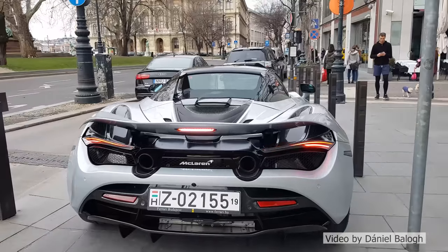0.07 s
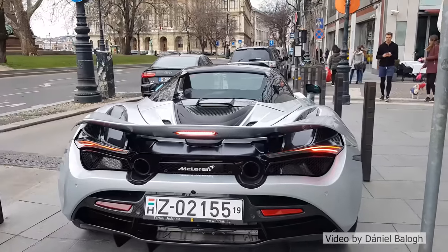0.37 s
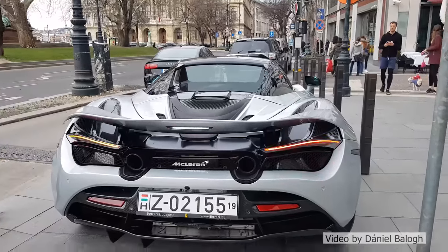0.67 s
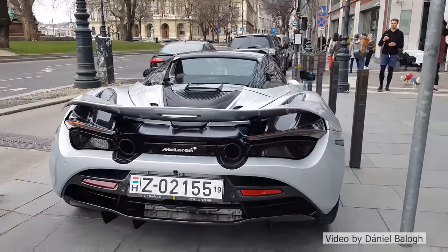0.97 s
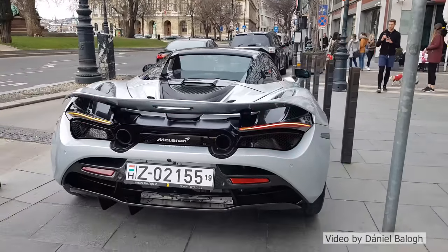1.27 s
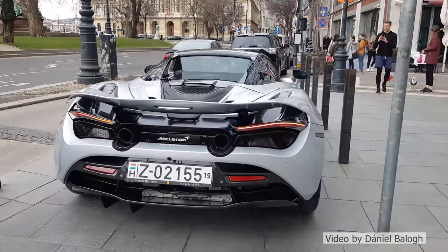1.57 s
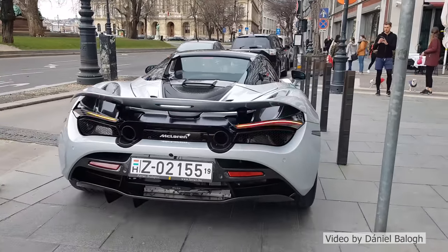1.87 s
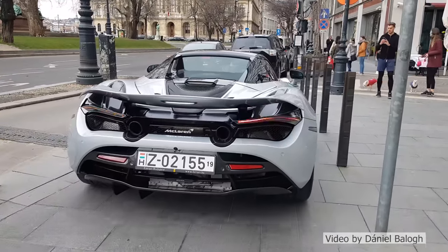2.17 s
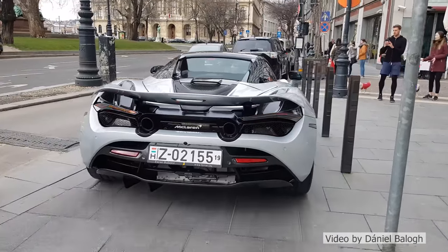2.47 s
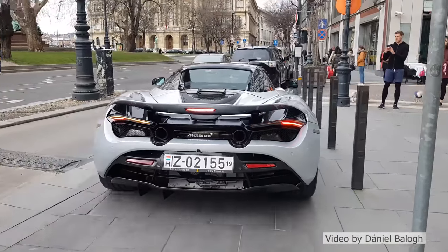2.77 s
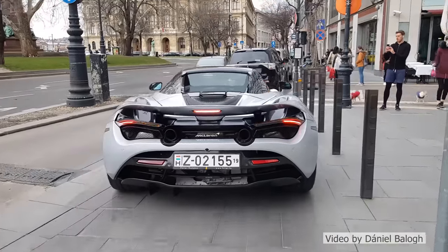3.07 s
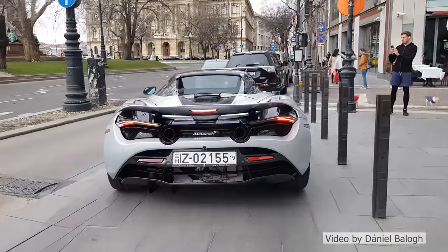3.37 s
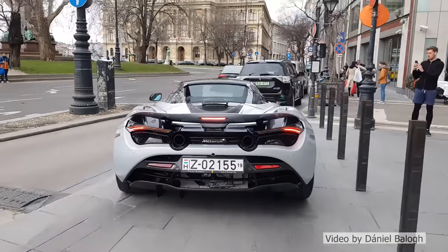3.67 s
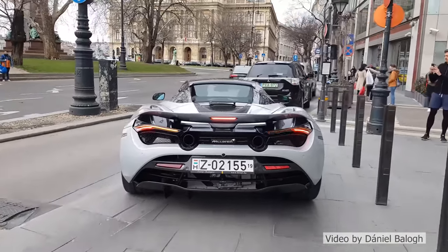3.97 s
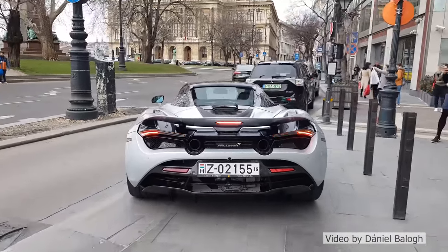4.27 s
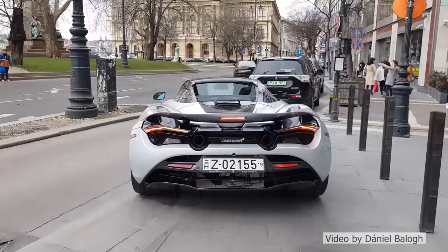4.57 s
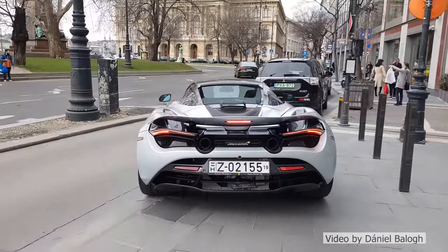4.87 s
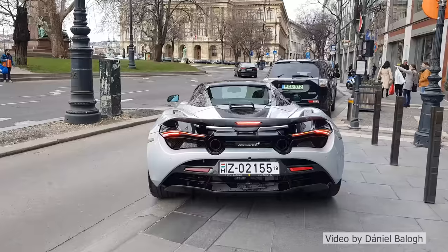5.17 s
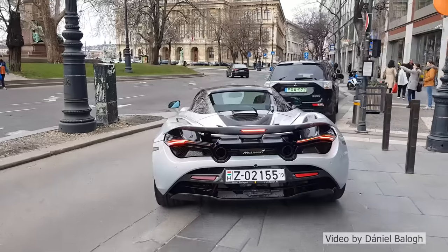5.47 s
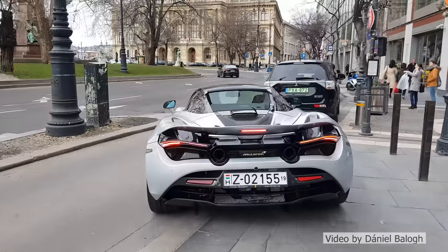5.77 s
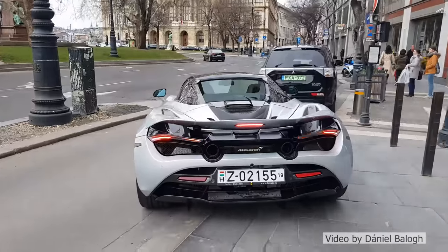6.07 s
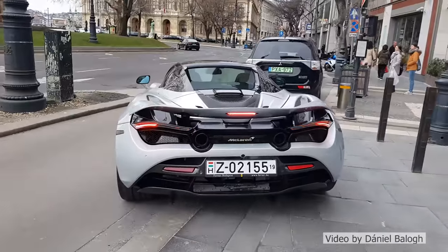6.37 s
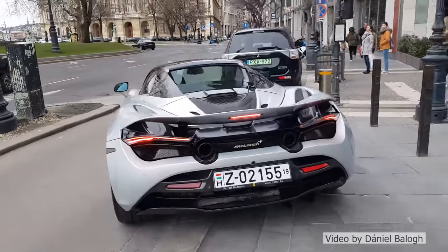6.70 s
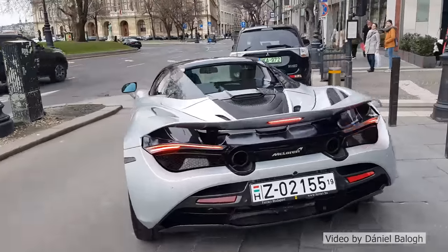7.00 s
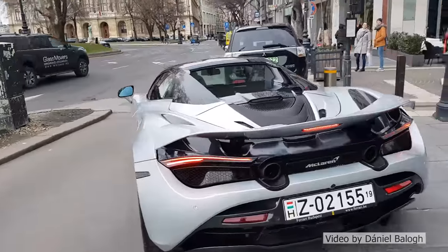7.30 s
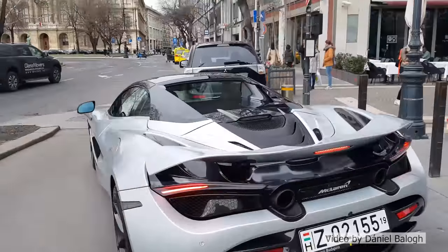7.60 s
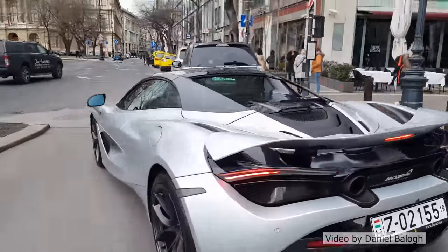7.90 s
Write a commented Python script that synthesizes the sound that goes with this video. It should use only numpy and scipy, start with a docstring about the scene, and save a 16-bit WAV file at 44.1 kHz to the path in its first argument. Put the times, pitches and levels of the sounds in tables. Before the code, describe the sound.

A sports car idles deeply, revs gently once, then creeps along with an uneven throb over faint city street noise.

```python
"""A V8 sports car creeps off a pavement into a city street, followed by a hand-held camera.
It idles over the street's wash, with fan tones and the turbulent rush of gas; a shoe scuffs the paving.
One gentle rise of revs sweeps the firing tone into the exhaust's resonance, which booms near 2 s.
The revs sink, the fan stops, and from 4.3 s the clutch takes the load: unequal firings lope and throb.
Near 6 s fingers click and rub on the camera, which then closes in on the car's rear wing."""
import sys
import numpy as np
from scipy import signal
from scipy.fft import rfft, irfft
from scipy.io import wavfile
from scipy.ndimage import map_coordinates

SR = 44100
rng = np.random.default_rng(int(sys.argv[2]) if len(sys.argv) > 2 else 0)


def wrap_up_sound(samples):
    """Save the sound to the file named by the first command line argument, as 16-bit audio."""
    columns = np.atleast_2d(samples).T
    # keep every value between -1 and 1, then stretch to whole-number steps
    tamed = np.clip(columns, -1, 1)
    steps = np.round(tamed * 32767).astype(np.int16)
    wavfile.write(sys.argv[1], SR, steps)


N = 354563
TIME = np.arange(N) / SR


def gain_of(db):
    """Amplitude ratio of a level in decibels."""
    return 10 ** (np.asarray(db) / 20)


def unit_rms(x):
    """Normalisation to rms 1."""
    return x / np.sqrt(np.mean(x ** 2) + 1e-20)


def curves(rows):
    """Linear interpolation of each column of a timed table."""
    times, *columns = np.transpose(rows)
    return [np.interp(TIME, times, column) for column in columns]


def ramp(start_s, end_s):
    """Linear transition from 0 to 1."""
    return np.interp(TIME, (start_s, end_s), [0, 1])


def swell(at_s, half_width_s):
    """Gaussian envelope of height 1."""
    return np.exp(-((TIME - at_s) / half_width_s) ** 2)


def wander(rate_hz):
    """Random modulation of rms 1, band-limited to about the given rate."""
    points, coarse_s = rng.standard_normal(4000), TIME[::16]
    smooth = map_coordinates(points, [coarse_s * 2 * rate_hz + 5], order=2, mode="wrap")
    return unit_rms(np.interp(TIME, coarse_s, smooth))


def at_bins(spectrum):
    """Log-frequency interpolation onto the Fourier bins."""
    hz, value = np.transpose(spectrum)
    return np.interp(np.log(np.fft.rfftfreq(N, 1 / SR) + 1), np.log(hz + 1), value)


def coloured(x, spectrum):
    """Spectral shaping, normalised to rms 1."""
    return unit_rms(irfft(rfft(x) * gain_of(at_bins(spectrum)), N))


def resonate(x, hz, width_hz):
    """Two-pole resonance with gain 1 at its centre."""
    return signal.lfilter(*signal.iirpeak(hz, hz / width_hz, SR), x)


def modal_ring(drive, modes):
    """Modal superposition, rms 1; two passes through each resonance keep the valleys dark."""
    return unit_rms(sum(gain_of(db) * resonate(resonate(drive, hz, width), hz, 4 * width)
                        for hz, width, db in modes))


def pan(db):
    """Channel gains for a left-minus-right level difference."""
    return gain_of([[db / 2], [-db / 2]])


def whine(hz, db, width_hz, steady=0):
    """Line broadening: turbulence blurs a tone in each channel; `steady` weights the pure part."""
    blur = np.array([steady + wander(width_hz) + 1j * wander(width_hz) for side in range(2)])
    carrier = np.exp(2j * np.pi * np.cumsum(hz * np.ones(N)) / SR)
    return gain_of(db) * unit_rms((blur * carrier).real)


def order_lines(firings, orders, waver, waver_hz):
    """Engine orders: wavering harmonics of the crank, which turns once in four firings; rms 1."""
    out = np.zeros(N)
    for order, db in orders:
        angle = 2 * np.pi * (order * firings / 4 + rng.random())
        in_phase = 1 + waver * wander(waver_hz)
        quadrature = waver * wander(waver_hz)
        out += gain_of(db) * (in_phase * np.cos(angle) + quadrature * np.sin(angle))
    return unit_rms(out)


# Likeness of the two channels: (frequency [Hz], correlation [-1 to 1])
COHERENCE = [(20, 0.71), (150, 1), (300, 0.72), (550, 0.97), (900, 0.15), (2000, 0.25), (4000, -0.0032),
             (8000, -0.0024), (16000, -0.11)]
def air():
    """Spatial coherence: white noise, alike in both channels in the bass and diffuse in the treble."""
    left, independent = rfft(rng.standard_normal((2, N)))
    likeness = at_bins(COHERENCE)
    right = likeness * left + np.sqrt(1 - likeness ** 2) * independent
    return irfft(np.array([left, right]), N)


# Spectrum of the street: (frequency [Hz], relative level [dB])
STREET_SPECTRUM = [(20, -3), (60, 12.5), (150, -3.5), (400, -30), (1000, -7), (2000, -19.5), (5000, -36),
                   (15000, -47)]
def street():
    """Stationary noise: the city's steady wash."""
    return gain_of(-40.5) * coloured(air(), STREET_SPECTRUM)


def scuff():
    """Friction noise: a shoe brushes the paving."""
    grit = coloured(air(), [(500, -27), (1300, -2), (3000, 4), (4500, -6), (9000, -28)])
    return gain_of(-44) * grit * swell(0.283, 0.024)


# Faint high chirps: (time [s], half-width [s], frequency [Hz], level [dB])
CHIRPS = [(7.793, 0.0039, 9780, -43), (7.815, 0.0027, 5210, -38), (7.825, 0.006, 7500, -42)]
def squeaks():
    """Narrow-band noise in very short bursts."""
    noise = air()
    return sum(gain_of(db) * swell(s, half_width) * unit_rms(resonate(noise, hz, width_hz=600))
               for s, half_width, hz, db in CHIRPS)


# Slips of a finger: (time [s], half-width [s], level before panning [dB])
FINGER_SLIPS = [(6.256, 0.0075, -35), (6.48, 0.013, -45)]
def rubs():
    """Friction noise: skin brushes the camera's case."""
    grit = coloured(air(), [(3000, 2), (9000, -6), (12000, -1), (15000, -2)])
    return grit * pan(-10) * sum(gain_of(db) * swell(s, half_width) for s, half_width, db in FINGER_SLIPS)


# Tiny knocks: (time [s], level [dB], frequency [Hz], decay [ms], left minus right [dB])
CASE_KNOCKS = [(5.6777, -19, 12930, 0.13, 12), (5.7024, -7.5, 8470, 0.066, 26),
               (5.7029, -14.5, 1672, 0.63, 24), (6.168, -11, 12010, 0.083, -20),
               (6.2013, -6, 12310, 0.1, -20), (6.2527, -32, 2198, 0.21, -25)]
def clicks():
    """Damped oscillation: the camera's case rings for an instant, mostly in one channel."""
    out, t = np.zeros((2, N)), np.arange(1024) / SR
    for s, db, hz, decay_ms, side_db in CASE_KNOCKS:
        start = round(s * SR)
        knock = -gain_of(db) * np.exp(-1000 * t / decay_ms) * np.cos(2 * np.pi * hz * t - np.pi / 4)
        out[:, start:start + len(t)] += knock * pan(side_db) / pan(side_db).max()
    return out


# Firmer taps: (time [s], unfiltered level [dB], width [ms], cutoff [Hz], left minus right [dB])
CASE_TAPS = [(5.7022, -11, 0.15, 7000, 24), (6.2528, 0, 0.7, 2000, -24)]
def thumps():
    """Critical damping: a quick push on the case and its slower rebound."""
    out, t = np.zeros((2, N)), np.arange(1024) / SR
    for s, db, width_ms, cutoff_hz, side_db in CASE_TAPS:
        start, age = round(s * SR), 1000 * t / width_ms
        push = signal.lfilter(*signal.butter(2, cutoff_hz, fs=SR), (age - 1) * np.exp(-age))
        out[:, start:start + len(t)] += gain_of(db) * push * pan(side_db) / pan(side_db).max()
    return out


def load():
    """Engine load: 0 running free, 1 once the clutch has taken up the car."""
    return ramp(4.26, 5.1)


# Engine speed: (time [s], firing rate [Hz])
FIRING_RATE = [(0.05, 64.36), (0.66, 59.5), (0.82, 58.9), (0.99, 60.86), (1.11, 63.8), (1.19, 66.35),
               (1.68, 87.75), (1.85, 96.55), (1.87, 96.74), (1.94, 94.5), (2.27, 89.1), (2.43, 84.8),
               (2.6, 82.9), (3.02, 71.4), (3.64, 62.1), (3.85, 60.8), (3.99, 60.8), (4.25, 59.46),
               (4.8, 62.2), (5.18, 63.3), (5.57, 55.47), (6.52, 55.4), (6.76, 56.9), (6.91, 56.93),
               (7.27, 58.46), (7.95, 58.26)]
def firing_hz():
    """The exhaust's fundamental frequency is the rate of firing."""
    return curves(FIRING_RATE)[0]


# The engine's effort, as gas flow: (time [s], level [dB])
GAS_FLOW = [(0.0, -46), (0.09, -45), (0.77, -45), (1.55, -41.5), (2.04, -42), (2.39, -46.5), (3.98, -49),
            (4.78, -44.5), (5.2, -38.5), (5.45, -38), (7.95, -37.5)]
def level(idle_db, per_flow_db, per_octave_db, close_db):
    """Power law: a layer's level in dB follows flow and revs, and gains as the camera nears the wing."""
    idle_flow_db, idle_hz = -48, 60
    flow_db = curves(GAS_FLOW)[0] - idle_flow_db
    octaves = np.log2(firing_hz() / idle_hz)
    return idle_db + per_flow_db * flow_db + per_octave_db * octaves + close_db * ramp(6.194, 7.15)


def fan(blade_hz=332.6, power_off_s=3.65, slowing_per_s=0.4):
    """Blade-passing tone: it holds its pitch until the power is cut, then sinks and dies."""
    hz = blade_hz * np.exp(-slowing_per_s * np.maximum(TIME - power_off_s, 0))
    db = np.maximum(-46 - 7.5 * TIME, -54.5)
    return (1 - ramp(4.21, 4.4)) * whine(hz, db, width_hz=6.3, steady=8.4)


def pump():
    """A broadened tone: the pump's whine, slowly fading."""
    return whine(hz=1698, db=-55 - 3.5 * TIME, width_hz=22, steady=0.52)


# The intake's whistle: (time [s], frequency [Hz], level [dB])
INTAKE_WHISTLE = [(0.9, 3180, -75), (1.45, 3207, -56), (1.9, 3277, -56.5), (2.35, 3260, -66),
                  (2.75, 3269, -58), (3.3, 3211, -68), (4.4, 3030, -69), (4.85, 3066, -57.5),
                  (5.2, 3120, -52.5), (5.6, 3200, -74), (8.0, 3260, -66)]
def intake():
    """Flow noise in a narrow, gliding band."""
    return whine(*curves(INTAKE_WHISTLE), width_hz=60)


# Thin tones: (time [s], half-width [s], frequency [Hz], broadening [Hz], level [dB])
THIN_TONES = [(0.3, 0.66, 380, 5, -62), (1.17, 0.28, 480, 5.916, -56), (0.85, 0.71, 1190, 25, -53.5),
              (1.5, 0.33, 1100, 35, -50.5), (2.1, 0.52, 4400, 299, -67), (1.85, 0.4, 5500, 97, -64),
              (2.827, 0.35, 1090, 35, -53), (2.66, 0.28, 1610, 40, -54), (4.44, 0.74, 830, 37, -51.5),
              (4, 0.55, 11200, 500, -62.5), (4.27, 0.11, 9300, 35, -65), (5.11, 0.55, 6000, 230, -58),
              (5.01, 0.31, 1500, 54, -48)]
def whistles():
    """Narrow-band noise, heard as whistles that come and go."""
    return sum(whine(hz, db, width) * swell(s, half_width) for s, half_width, hz, width, db in THIN_TONES)


# Rings in the engine bay's hiss: (frequency [Hz], bandwidth [Hz], relative level [dB])
BAY_RESONANCES = [(3020, 110, -1.5), (5710, 91, -1), (6070, 58, 3), (9300, 130, -3), (11000, 630, -8.5)]
def engine_bay():
    """Resonances excited by noise, louder under load."""
    return gain_of(-62 + 4.5 * load()) * modal_ring(air(), BAY_RESONANCES)


def ground_bounce(x):
    """Comb filtering: the paving returns a weak copy whose delay drifts as the camera sways."""
    delay_s = 0.0013 * (1 + 0.06 * wander(0.7))
    return x + 0.16 * np.array([np.interp(TIME - delay_s, TIME, side) for side in x])


# Gain of the highest treble: (time [s], gain [dB])
TREBLE_GAIN = [(0.0, 4), (0.8, 1), (1.4, 2), (1.85, -2), (2.3, -0.5), (3.0, 0), (3.9, 2.5), (4.9, 0.5),
               (5.4, 1), (6.0, 1), (6.4, -2.5), (6.65, -2), (6.95, 2), (8.0, 0)]
def sway(x, depth_db=0.96, rate_hz=1.143):
    """Directivity: treble bands drift in level as the camera turns; the top dims and brightens."""
    spectrum, hz = rfft(x), np.fft.rfftfreq(N, 1 / SR)
    centres_hz = np.linspace(3000, 15000, 9)
    low, *treble = [irfft(spectrum * np.interp(hz, centres_hz, band), N) for band in np.eye(9)]
    shares = np.interp(centres_hz[1:], [6000, 10500], [0, 1])
    top_db, = curves(TREBLE_GAIN)
    return low + sum(band * gain_of(depth_db * wander(rate_hz) + share * top_db)
                     for band, share in zip(treble, shares))


# Spectra of roar and hiss, idling and loaded: (frequency [Hz], relative level [dB])
IDLE_ROAR = [(180, -44), (300, -4), (343, -6), (391, -7), (418, -4.5), (451, -5.5), (588, 3.5), (643, -8.5),
             (829, -9.5), (1470, -15), (1640, -13), (2290, -25), (3260, -25.5), (4200, -34), (5460, -39.5),
             (9240, -120)]
LOADED_ROAR = [(180, -100), (300, -15), (400, -13), (437, -8), (510, -8), (588, 4), (694, -13),
               (1020, -8.5), (1400, -14.5), (1680, -14), (2730, -26), (3190, -22.5), (4200, -28.5),
               (5460, -48), (9240, -120)]
IDLE_HISS = [(2240, -6.5), (3800, -2), (3960, -6), (4880, -4.5), (6200, 3.5), (6660, -1), (7730, -1),
             (8550, -5.5), (9020, -4.5), (9920, -2.5), (11200, -1), (13100, -5.5), (15000, -3.5),
             (15800, -2)]
LOADED_HISS = [(2240, -47), (3800, -12), (4710, -2.5), (5910, 4), (6980, 0), (8200, -2), (11600, -0.5),
               (13600, -1), (15100, -4), (15800, 2)]
def rush(firings, hiss_lead_s=0.096):
    """Turbulence noise: fans and escaping gas roar and hiss, pulsing with the engine."""
    noise, pull = air(), load()
    roar = (1 - pull) * coloured(noise, IDLE_ROAR) + pull * coloured(noise, LOADED_ROAR)
    roar = unit_rms(roar - 0.85 * resonate(roar, 605.7, 123))  # hollow where the tailpipes take over
    roar_db = level(idle_db=-45, per_flow_db=1.0913, per_octave_db=-2.5, close_db=0.15)
    roar *= gain_of(roar_db + 0.5 * wander(22)) * (1 + 0.048 * np.cos(2 * np.pi * firings))
    hiss = unit_rms((1 - pull) * coloured(noise, IDLE_HISS) + pull * coloured(noise, LOADED_HISS))
    hiss_db = level(idle_db=-54.5, per_flow_db=1, per_octave_db=1.8, close_db=0.9)
    hiss_db = np.maximum(hiss_db, np.interp(TIME + hiss_lead_s, TIME, hiss_db))  # rises ahead of the roar
    hiss *= gain_of(hiss_db + 0.76 * wander(12)) * (1 + 0.15 * np.cos(np.pi * firings))
    return roar * pan(-0.81) + hiss * pan(-0.4)


# The tailpipes' ring: (time [s], relative level [dB])
RING_ENVELOPE = [(0.0, -43), (0.25, -45), (0.85, -44), (1.15, -38), (1.9, -39), (2.4, -43.5), (3.1, -47),
                 (3.8, -40), (4.3, -39.5), (4.7, -44.5), (5.1, -45), (5.4, -35.5), (6.8, -31), (7.3, -36),
                 (8.0, -35.5)]
def ring_db():
    """Envelope in dB shared by the tailpipes' resonances and their tone."""
    return curves(RING_ENVELOPE)[0] - 6.5


def pipe_tone():
    """Edge tone: gas crossing the tailpipes' lips holds a narrow note that weakens under load."""
    hz = 596 * (1 + 0.01 * wander(1.2))
    return whine(hz, ring_db() - 1.5 - 5.5 * load(), width_hz=11, steady=1.9)


# Strength of each cylinder in firing order: (relative level [dB])
CYLINDER_LEVELS = [-3.5, -16.5, -3, -8, -4.5, -7.5, -3, -7]
# Tailpipe resonances: (frequency [Hz], bandwidth [Hz], relative level [dB])
TAILPIPE_MODES = [(579, 51, -24), (596, 48, 8), (1032, 48, -2.5), (1684, 150, -16.5)]
# Muffler transmission: (frequency [Hz], relative gain [dB])
MUFFLER_RESPONSE = [(20, -40), (36, 0), (46, 8), (90, 12), (140, 1), (175, 1.5), (205, 1), (232, 0.5),
                    (265, -3.5), (330, -7), (420, -11.5), (520, -20), (800, -43)]
def puffs(firings, gas_share=0.6, decay_firings=0.43):
    """Source and filter: each firing's pulse and puff ring the tailpipes; the muffler rumbles with gas."""
    count = firings.astype(int)
    scatter_db = rng.standard_normal(1000)[count]
    strength = gain_of(np.take(CYLINDER_LEVELS, count, mode="wrap") + scatter_db)
    pulses = unit_rms(np.diff(count, prepend=0) * strength)
    gas = unit_rms(air() * strength * (0.3 + np.exp(-(firings % 1) / decay_firings)))
    ring = modal_ring((1 - gas_share) * pulses + gas_share * gas, TAILPIPE_MODES)
    rumble_db = level(idle_db=-42, per_flow_db=1, per_octave_db=1.5, close_db=1)
    rumble_db += 2 * load()  # more turbulent under load
    return gain_of(ring_db()) * ring + gain_of(rumble_db) * coloured(gas, MUFFLER_RESPONSE)


THROTTLE_S = 1.41  # the driver opens the throttle briefly
# Open-throttle overtones: (engine order, relative level [dB])
SNARL_LINES = [(16, -3), (18, 1), (28, 3), (29, 7), (30, -2), (32, 1), (36, -2), (38, 2), (42, -4),
               (44, -9)]
def snarl(firings):
    """Sharper pulses carry higher harmonics: clear overtones climb while the throttle is open."""
    lines = order_lines(firings, SNARL_LINES, waver=0.25, waver_hz=5)
    return gain_of(-40.5) * swell(THROTTLE_S, 0.28) * lines


# Rough overtones: (engine order, relative level [dB])
HOWL_LINES = [(14, -9), (16, -9), (18, -4), (21, -5), (24, -1), (25, -5), (26, 0.5), (28, -8), (29, -5),
              (30, -3), (32, 2), (34, -4), (35, -1), (38, 2), (41, -8), (43, -5), (45, -0.5), (46, -6),
              (63, 0.5)]
# Their strength against revs: (firing rate [Hz], level before the throttle's boost [dB])
HOWL_LEVELS = [(58, -53.5), (70, -61), (82, -47.5), (95, -39)]
# Pipe transmission: (frequency [Hz], relative gain [dB])
PIPE_RESPONSE = [(330, -4), (450, -4), (545, 5), (620, 11.5), (690, -17), (800, -4), (930, -11), (1030, 5),
                 (1150, -11), (1450, -5), (2000, -12)]
def howl(firings):
    """Formant filtering: overtones grow with revs and throttle and sweep through the pipes' resonances."""
    db = np.interp(firing_hz(), *np.transpose(HOWL_LEVELS)) + 5 * swell(THROTTLE_S, 0.19)
    lines = order_lines(firings, HOWL_LINES, waver=0.5, waver_hz=8)
    return gain_of(db) * coloured(lines, PIPE_RESPONSE)


# Overtones beside the car: (engine order, relative level [dB])
FLANK_LINES = [(6, 7.5), (14, 1.5), (16, -14), (18, 6.5), (20, -6), (22, -6), (26, -10), (30, -5)]
def flank(firings):
    """Proximity: strongly wavering harmonics emerge as the camera reaches the car's flank."""
    return gain_of(-33) * ramp(6.67, 7.86) * order_lines(firings, FLANK_LINES, waver=0.77, waver_hz=12)


# Middle overtones: (engine order, relative level [dB])
BURBLE_LINES = [(8, -5), (10, 3), (12, 6), (13, -6), (14, 0), (15, -11), (16, -4), (18, -8.5), (21, -9)]
# Response of the muffler's shell: (frequency [Hz], relative gain [dB])
SHELL_RESPONSE = [(100, 8), (150, -2.5), (182, -8), (208, -2.5), (234, 5.5), (258, 4.5), (290, -6),
                  (340, 0.5), (400, 4.5), (600, -1)]
def burble(firings):
    """Shell resonance colours the middle harmonics; fast amplitude modulation makes them growl."""
    db = level(idle_db=-48, per_flow_db=0.755, per_octave_db=6, close_db=0)
    db += 4 * swell(1.65, 0.11)  # peaks as the pipes fill
    lines = order_lines(firings, BURBLE_LINES, waver=0.55, waver_hz=5.5)
    growl = 1 + 0.17 * wander(35)  # no two firings are quite alike
    return gain_of(db) * coloured(lines, SHELL_RESPONSE) * growl


# Lines around the firing tone and its octave: (engine order, relative level [dB])
LOPE_LINES = [(3, -12), (5, -1.5), (6, 0.5), (7, -16), (9, -21)]
def lope(firings):
    """Sidebands: unequal cylinders add lines that beat with the firing tone."""
    db = level(idle_db=-42.5, per_flow_db=0.19, per_octave_db=0, close_db=10.5)
    db += 7 * swell(THROTTLE_S, 0.19)
    return gain_of(db) * order_lines(firings, LOPE_LINES, waver=0.12, waver_hz=3)


CLUTCH_SLIP = swell(5.8, 0.8)
# Weak firings: (time [s], gain [dB])
WEAK_FIRINGS = [(4.38, -8), (5.64, -8), (5.79, -11)]
def judder_db(period_s=0.129, phase_origin_s=8.8):
    """Amplitude modulation: the firing tone throbs as the clutch slips and dips at weak firings."""
    depth_db = 2.5 * CLUTCH_SLIP * (1 + 0.31 * wander(3))
    throb_db = -depth_db * np.cos(2 * np.pi * (TIME - phase_origin_s) / period_s)
    return throb_db + sum(db * swell(s, 0.038) for s, db in WEAK_FIRINGS)


# Resonance curve of the exhaust: (frequency [Hz], level of a tone at idle flow [dB])
EXHAUST_RESPONSE = [(55, -35.5), (59, -33.5), (63, -30.5), (69, -27.5), (77, -21), (88, -14), (98, -18),
                    (110, -35), (120, -36), (132, -38.5), (152, -40), (170, -50), (195, -48)]
def boom(firings, lag_rad=0.03):
    """Forced resonance: the firing tone and its octave swell where they meet the exhaust's peaks."""
    response = np.transpose(EXHAUST_RESPONSE)
    bite_db = 1.5 * swell(5.15, 0.18)  # the clutch bites
    tone_db = np.interp(firing_hz(), *response) + bite_db + judder_db()
    tone_db += level(idle_db=-0.5, per_flow_db=0.87, per_octave_db=-0.6, close_db=3.5)
    tone_db -= 1.2 * load() * wander(7.5)  # combustion is less even under load
    octave_db = np.interp(2 * firing_hz(), *response) + 0.62 * bite_db
    octave_db += level(idle_db=0, per_flow_db=0.98, per_octave_db=0.3, close_db=0.495)
    tone = gain_of(tone_db) * np.cos(2 * np.pi * firings)
    channel_phase = np.array([[lag_rad], [-lag_rad]])  # the octave arrives slightly out of step
    octave = gain_of(octave_db) * np.cos(4 * np.pi * firings + channel_phase)
    return -np.sqrt(2) * (tone + octave)


def scene():
    """Superposition: one running count of firings keeps the exhaust's layers in step over the street."""
    unsteadiness = 0.005 * (1 + CLUTCH_SLIP)  # the speed hunts, more so while the clutch slips
    firings = np.cumsum(firing_hz() * (1 + unsteadiness * wander(4))) / SR
    car = (boom(firings) + lope(firings)) * pan(1.24)
    car += burble(firings) + flank(firings) + howl(firings) + puffs(firings)
    car += sway(ground_bounce(rush(firings)))
    car += snarl(firings) + pipe_tone()
    car += engine_bay() + fan() + pump() + intake() + whistles()
    return car + street() + scuff() + clicks() + thumps() + rubs() + squeaks()


def record(dry):
    """Band limiting: the recorder's steep low-pass filter."""
    low_pass = signal.firwin(511, cutoff=15900, window=("kaiser", 9), fs=SR)
    return signal.oaconvolve(dry, low_pass[None], "same")


dry = scene()
out = record(dry)
wrap_up_sound(out)
```